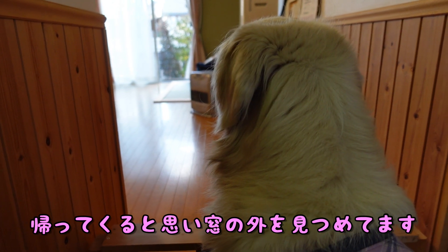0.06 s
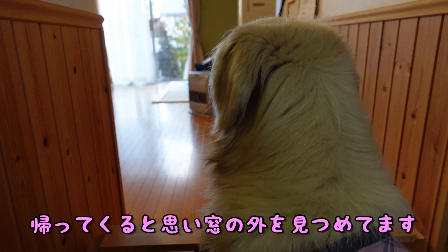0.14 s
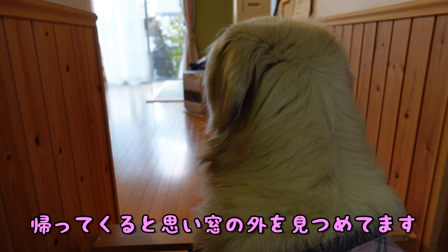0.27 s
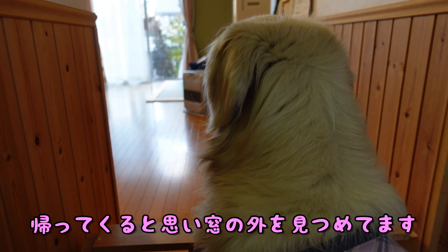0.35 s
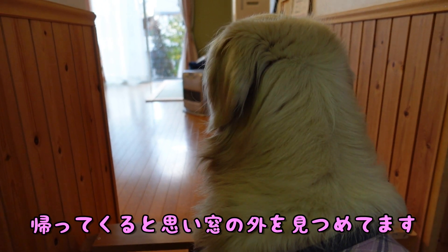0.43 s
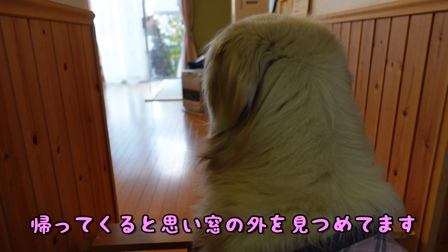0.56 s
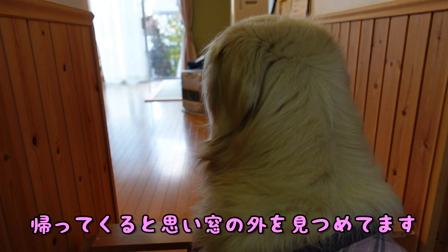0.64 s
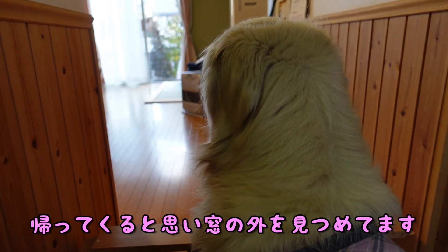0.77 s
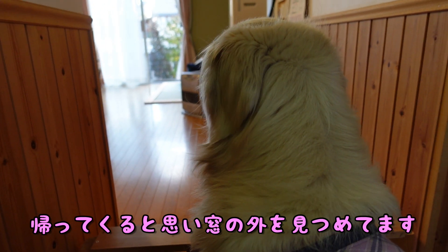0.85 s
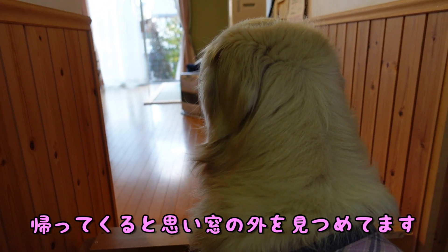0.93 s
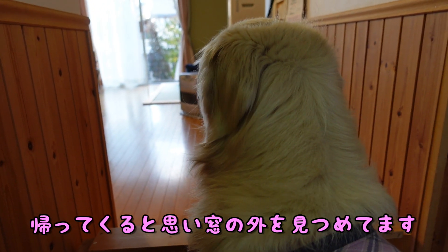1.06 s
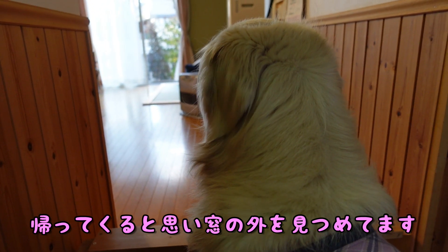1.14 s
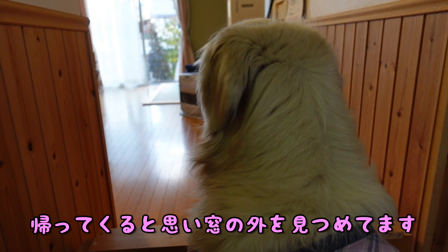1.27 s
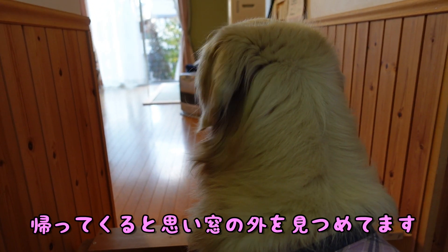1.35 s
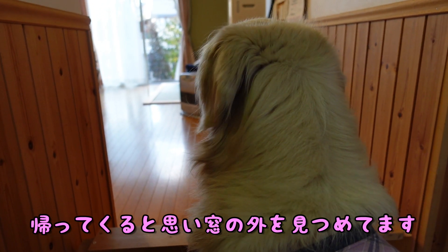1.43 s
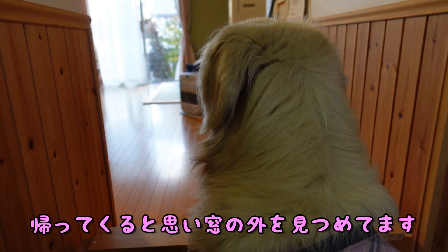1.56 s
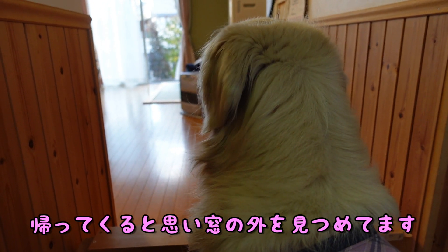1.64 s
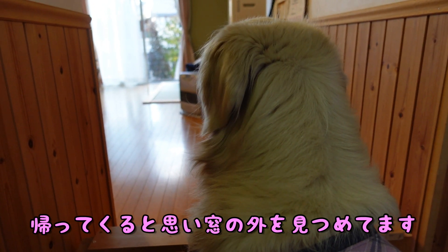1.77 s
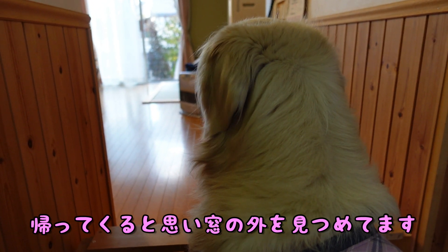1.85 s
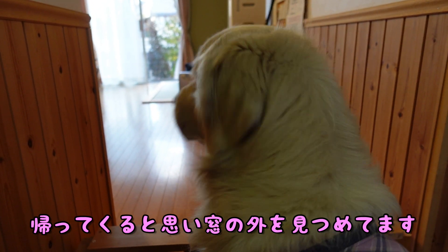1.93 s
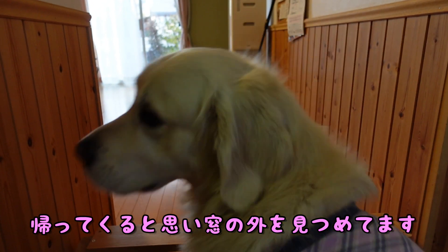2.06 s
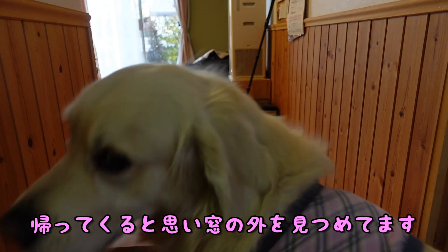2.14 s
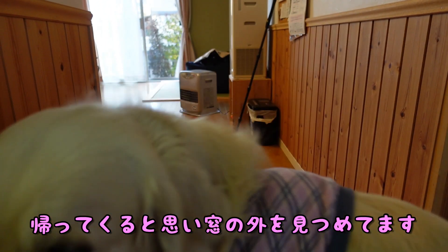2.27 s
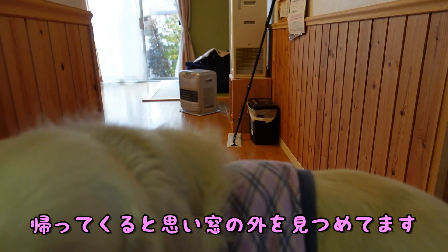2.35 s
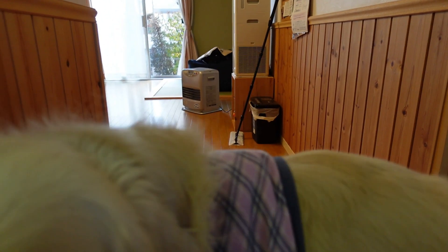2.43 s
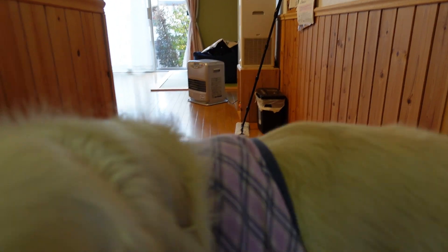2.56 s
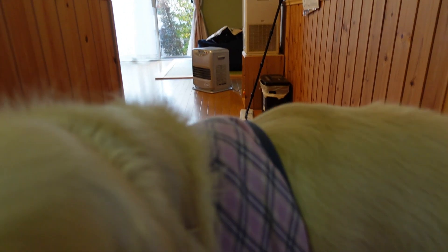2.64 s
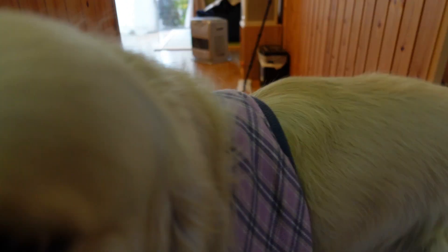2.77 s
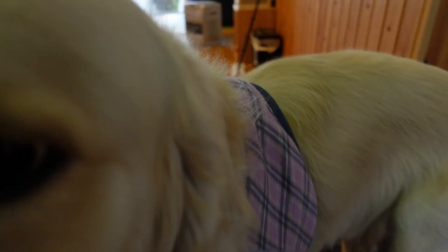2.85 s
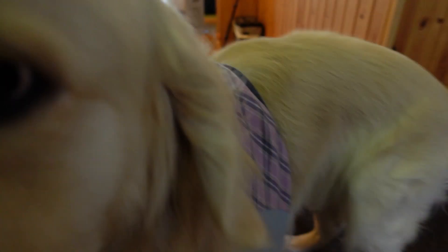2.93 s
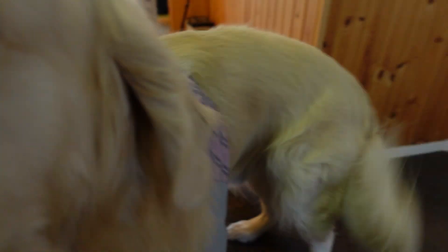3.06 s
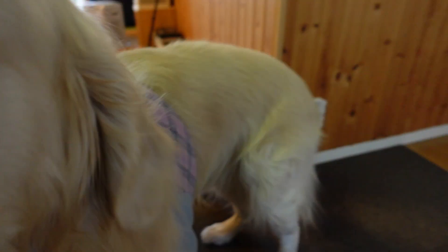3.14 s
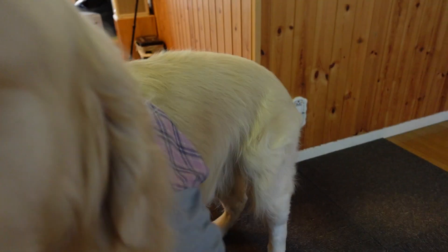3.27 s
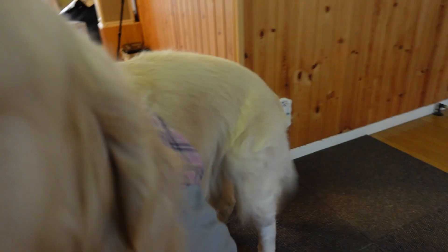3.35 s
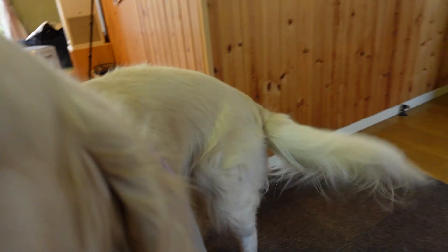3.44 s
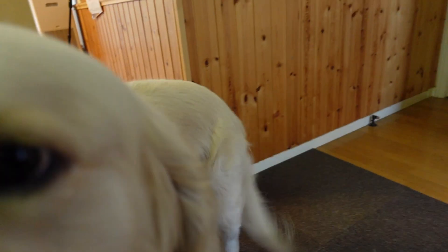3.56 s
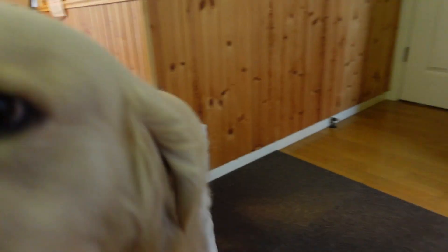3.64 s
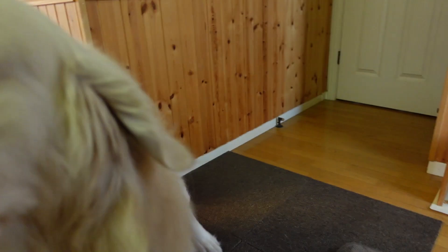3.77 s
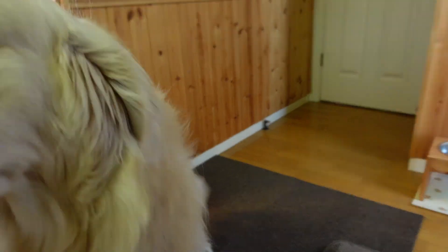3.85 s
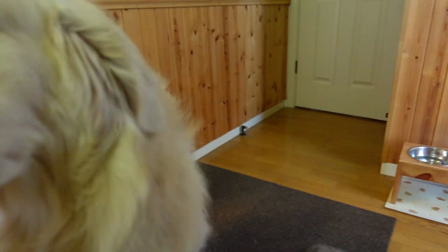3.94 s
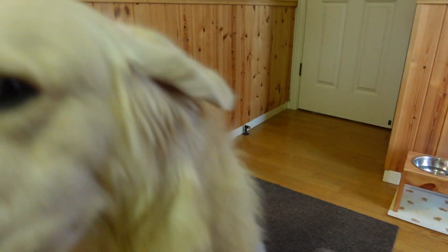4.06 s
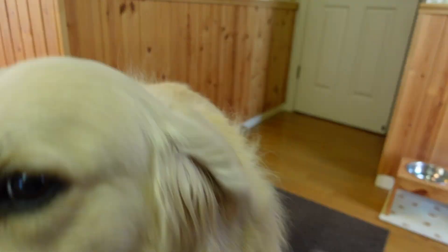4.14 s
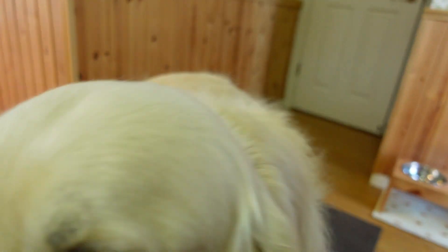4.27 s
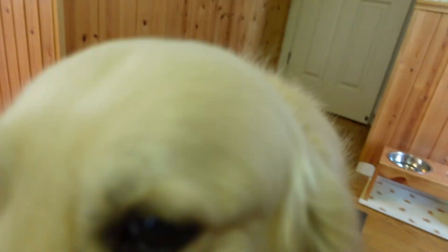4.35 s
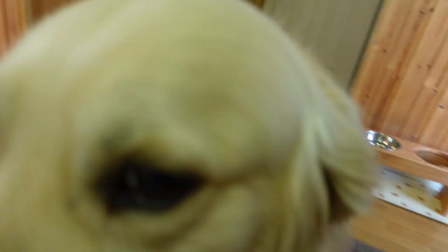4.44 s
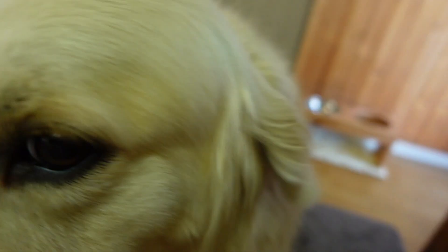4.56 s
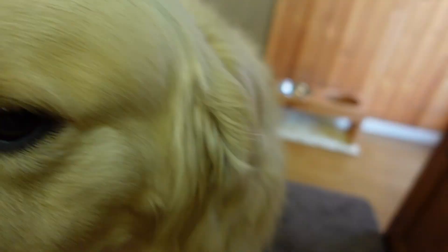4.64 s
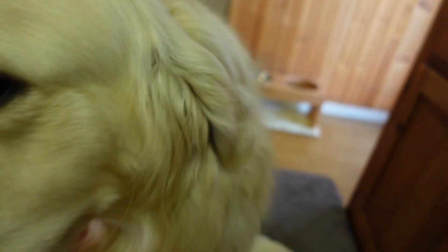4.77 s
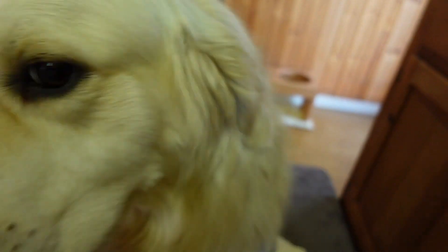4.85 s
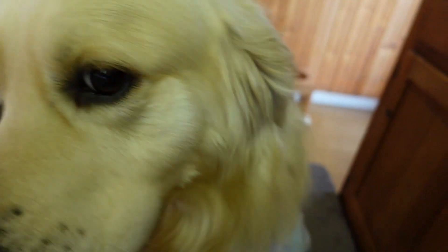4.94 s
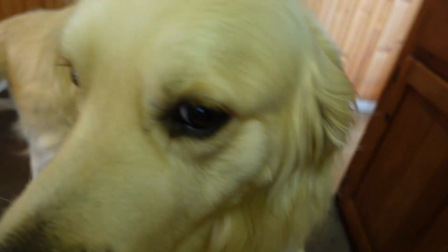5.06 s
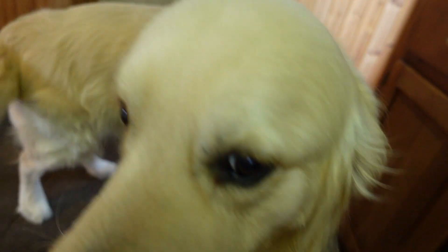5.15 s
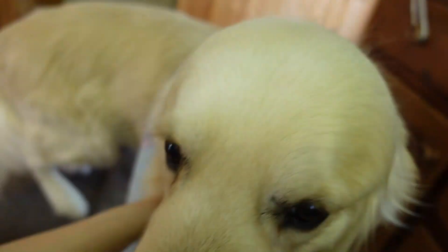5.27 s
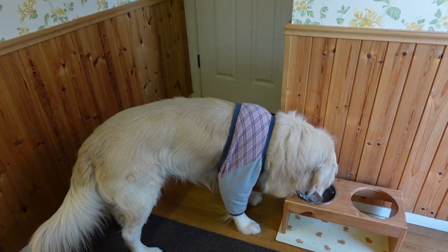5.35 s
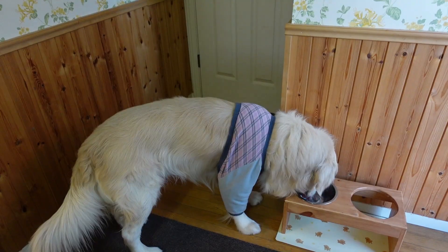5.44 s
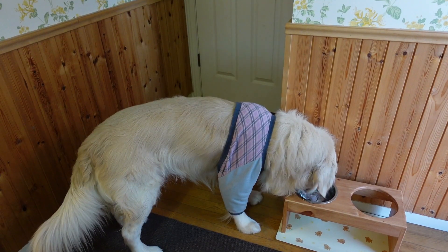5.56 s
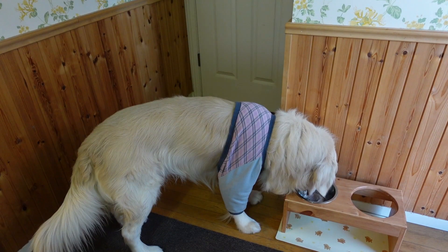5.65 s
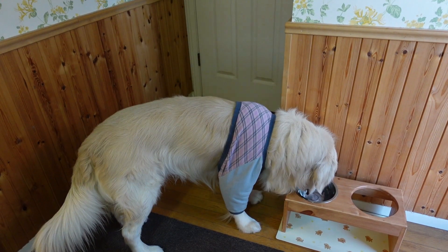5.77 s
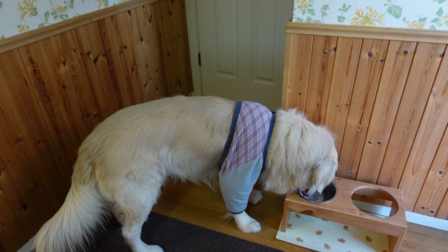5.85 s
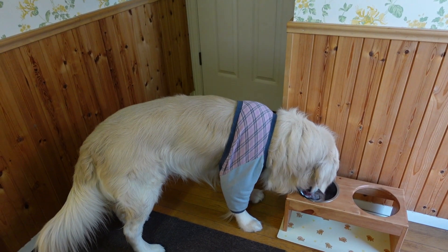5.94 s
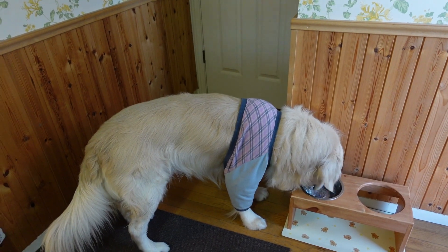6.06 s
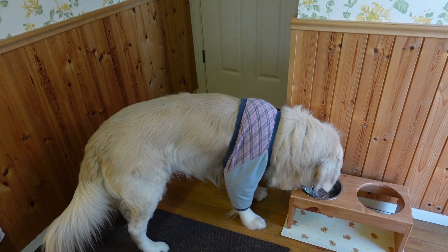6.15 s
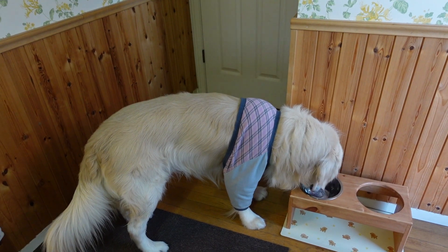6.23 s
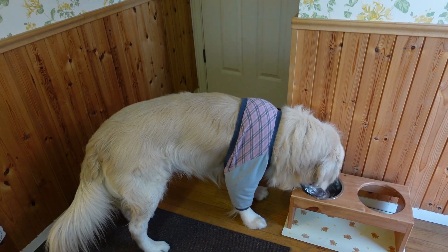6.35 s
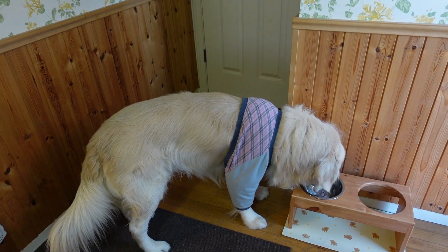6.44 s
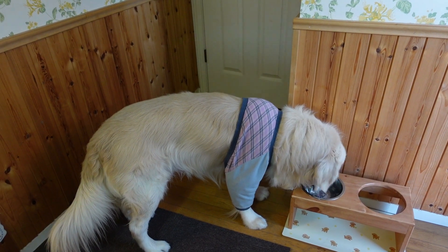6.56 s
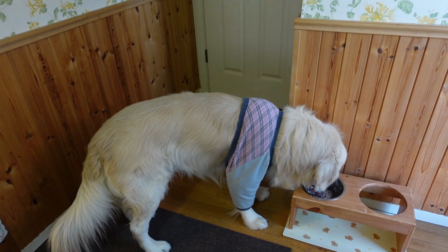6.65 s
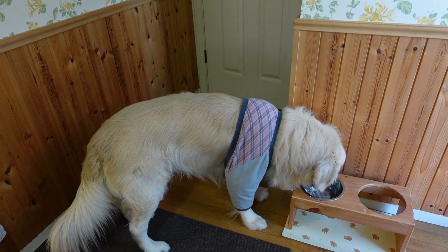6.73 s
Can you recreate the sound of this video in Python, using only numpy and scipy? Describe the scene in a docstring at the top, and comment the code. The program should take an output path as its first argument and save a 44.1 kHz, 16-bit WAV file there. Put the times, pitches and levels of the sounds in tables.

```python
"""In a wood-panelled room a big dog whines thinly and pads across the floor, sniffing and smacking its lips
at the microphone, and snorts once right into it. After a brief silence it laps water from a steel bowl a
little way off. An appliance hums before and after the silence. Air sounds are shaped noise; paws, water
and steel are decaying resonances; the whine is a wavering sine with overtones."""
import sys
import numpy as np
from scipy import signal
from scipy.fft import rfft, irfft
from scipy.io import wavfile
from scipy.ndimage import uniform_filter1d

SR = 44100
rng = np.random.default_rng(int(sys.argv[2]) if len(sys.argv) > 2 else 0)


def output_pcm(signal):
    """Save a mono or channel-first signal as 16-bit PCM at the path in sys.argv[1].

    Samples are clipped to [-1, 1] before scaling.
    """
    pcm = np.clip(np.atleast_2d(signal).T, -1, 1) * 32767
    wavfile.write(sys.argv[1], SR, np.round(pcm).astype(np.int16))


N = 299880

# the scene's clock, and the time since a blow (s)
TIME = np.arange(N) / SR
AGE = np.arange(2 ** 12 * 3) / SR
# the brief silence before the lapping: from_s, until_s
CUT = (5.352, 5.39)
# likeness of the two channels for sound from close by: hz, likeness (0-1)
CLOSE = [(100, .9995), (400, 0.99), (1000, 0.87), (2300, 0.77), (4500, 0.58), (12000, 0.54)]
# hiss of air at the nostrils: hz, level_db_per_hz
HISS = [(4000, -19), (7000, -5.5), (10000, -11), (13000, -17.5), (16000, -27)]
# water rocking in the bowl: time_s, level_db
SLOSH = [(5.391, -37), (5.44, -41.5), (5.578, -36.5), (5.81, -46), (5.97, -44), (6.136, -36),
         (6.594, -44.5), (6.8, -40.5)]


def amp(db):
    """Turns decibels into a gain."""
    return 10 ** (np.asarray(db) / 20)


def unit(x):
    """Scales to rms 1."""
    return x / np.sqrt(np.mean(x ** 2) + 1e-20)


def peaked(x):
    """Scales the loudest 4 ms to rms 0.5, for a crest near 1."""
    power = np.mean(np.atleast_2d(x) ** 2, 0)
    return x / np.sqrt(4 * uniform_filter1d(power, size=176).max())


def read(points, hz):
    """Reads a spectrum on a log-frequency axis."""
    f, value = np.transpose(points)
    return np.interp(np.log(hz + 1), np.log(f), value)


def level(s, db, fade=.01):
    """A gain curve that fades to -120 dB outside its span, over fade seconds."""
    times = np.r_[s[0] - abs(fade), s, s[-1] + abs(fade)]
    return amp(np.interp(TIME, times, np.r_[-120, db, -120]))


def add(mix, s, sound):
    """Lays a sound into the mix from s seconds on."""
    part = mix[:, round(s * SR):][:, :sound.shape[-1]]
    part += sound[..., :part.shape[1]]


def pan(db):
    """Gains of left against right."""
    return amp([[db / 2], [-db / 2]])


def drift(rate):
    """Random wander of rms 1 through rate knots per second."""
    knots = rng.standard_normal(int(N / SR * rate) + 2)
    return unit(np.interp(TIME * rate, np.arange(len(knots)), knots))


def noise(likeness, colour=None, size=N):
    """Two channels of noise, rms 1, with a given likeness and spectrum."""
    hz = np.fft.rfftfreq(size, 1 / SR)
    a, b = rfft(rng.standard_normal((2, size)))
    same = np.clip(read(likeness, hz), 0, 1)
    z = np.array([a, same * a + np.sqrt(1 - same ** 2) * b])
    gain = amp(read(colour, hz)) if colour else 1
    return unit(irfft(z * gain, size))


def resonate(x, hz, width_hz):
    """A resonance of gain 1 whose pitch may follow a curve."""
    turn = np.exp(2j * np.pi * np.cumsum(hz * np.ones(x.shape[-1])) / SR)
    r = np.exp(-np.pi * width_hz / SR)
    # turn the pitch down to zero, smooth, and turn it back up
    smooth = signal.lfilter([1 - r], [1, -r], x / turn + 1e-18)
    return 2 * (turn * smooth).real


def breathy(hz, width_hz):
    """Air through a cavity, fixed or moving: a fuzzy whistle of rms 1."""
    hz = np.clip(hz, 500, 8000)
    narrow = resonate(noise(CLOSE), hz, width_hz)
    return unit(resonate(narrow, hz, 2 * width_hz))


def swell(top_s, rise_s, hold_s, fall_db_per_s):
    """The gain of one push of air: climbs 20 dB during its rise, holds, then dies away."""
    early = np.maximum(top_s - TIME, 0) / max(rise_s, .002)
    late = np.maximum(TIME - top_s - abs(hold_s), 0)
    return amp(np.maximum(-20 * early - abs(fall_db_per_s) * late, -160))


def arch(top_s, width_s):
    """A smooth hump of height 1, down 9 dB at width_s on either side."""
    return np.exp(-np.square((TIME - top_s) / width_s))


def ring(hz, t60, rise=0., size=len(AGE)):
    """A sine that swells within one cycle and dies away; its pitch may climb by the fraction rise."""
    t = AGE[:size]
    life = t / max(t60, .001)
    onset = 1 - np.exp(-(2 * hz * t) ** 2)
    pitch_hz = hz * (1 + rise * np.minimum(life, 1))
    return onset * amp(-60 * life) * np.sin(2 * np.pi * np.cumsum(pitch_hz) / SR)


def room(x, early_db, tail_db, early_t60=0.045):
    """Direct sound, sparse echoes off near panels, and a diffuse tail that dies band by band."""
    # the room's decay: hz, t60_s
    decay = [(150, 0.53), (600, 0.21), (2500, 0.26), (6000, 0.34), (14000, 0.047)]
    size = len(AGE)
    sparse = rng.random(size) < 1500 / SR
    early = noise(CLOSE, size=size) * sparse * amp(-60 * AGE / early_t60) * (AGE > .002)
    hz, t, z = signal.stft(noise(CLOSE, size=size), SR, nperseg=256)
    dying = z * amp(-60 * t / read(decay, hz)[:, None])
    tail = signal.istft(dying, SR, nperseg=256)[1][:, :size]
    tail *= np.minimum(AGE / 0.012, 1)
    response = (amp(early_db) * unit(early) + amp(tail_db) * unit(tail)) / np.sqrt(size)
    response[:, 0] += 1  # the direct sound
    return signal.fftconvolve(np.atleast_2d(x), response, axes=1)[:, :x.shape[-1]]


def droplets(hz, length, octaves, count=30, damping=1):
    """A clump of tiny bubbles and drops, spread in pitch, thinning out and fading 8 dB per length."""
    out = np.zeros((1, len(AGE)))
    delays = np.linspace(0, 1, count) ** 1.7 * 2 * abs(length) * rng.uniform(.75, 1.25, count)
    pitches = rng.permutation(np.linspace(-1, 1, count))
    sizes_db = rng.permutation(np.linspace(-6, 6, count))
    cycles = 9 + 3 / max(abs(octaves), .06)  # bubbles of one size ring longer than a mixed splash
    for delay, pitch, size_db in zip(delays, pitches, sizes_db):
        drop_hz = np.clip(hz * 2 ** (octaves * pitch), 400, 15000)
        drop = ring(drop_hz, cycles / damping / drop_hz, rise=.07, size=1024)
        add(out, delay, amp(size_db - 8 * delay / abs(length)) * drop)
    return out


def appliance():
    """Wavering tones in a steady rush; after the silence the room booms a little more and rumbles less."""
    # steady rush of the room: hz, level_db_per_hz
    hush_colour = [(15, -75), (25, -72), (59, -14), (174, -12.5), (205, -8.5), (248, -6), (284, 0),
                   (342, -9.5), (414, -8), (449, -14), (604, -18), (654, -16.5), (1870, -23), (6660, -43),
                   (15800, -50)]
    hush_db = -39
    # the appliance's tones: pitch_hz, level_db
    hum_tones = [(75.4, -55), (279.9, -45.5), (301.5, -67), (425.3, -66), (613.7, -56.5), (1583, -71),
                 (4517, -73.5), (10094, -81.5)]
    # likeness of the two channels for sound from all round: hz, likeness (0-1)
    diffuse = [(100, 1), (350, 0.99), (1000, 0.44), (2300, 0.32), (4500, 0.24), (12000, 0.16)]
    by_bowl = TIME > CUT[1]
    tones = sum(amp(db) * unit(resonate(rng.standard_normal(N), hz, width_hz=3.8)) for hz, db in hum_tones)
    boom_colour = [(170, -26), (235, 3.5), (290, 7.0), (330, -9), (430, -43)]
    boom = noise(diffuse, boom_colour) * amp(-40.5)
    hum = amp(hush_db) * noise(diffuse, hush_colour) * pan(db=1) + tones
    rumble = signal.sosfiltfilt(signal.butter(2, 110, fs=SR, output="sos"), hum)
    return hum + by_bowl * (boom - amp(-7.5) * rumble)


def sniffs():
    """Turbulent air in the nose, with hiss at the nostrils and a hollow note from the throat."""
    # sniffs: full_flow_s, rise_s, hold_s, flow_db, then nostril hiss_db and throat_db against the flow
    pushes = [(2.509, 0.022, .014, -34.5, -12, -5), (2.59, .09, 0.095, -33, -13, -26),
              (2.797, .025, 0.011, -31, -12, 2.5), (2.903, 0.065, 0.0079, -32.5, -14, -5.5),
              (3.085, 0.041, .03, -42.5, -16, -2), (3.255, 0.089, .03, -37, -16, -0.5),
              (3.305, .08, 0.006, -44, -4, -9), (3.565, .02, 0.018, -47, -11, -9),
              (3.668, 0.042, 0.094, -26, -9.5, -7.5), (4.03, 0.13, 0.026, -35.5, -19, 1),
              (4.099, 0.029, 0.0055, -29, -10, -3), (4.17, 0.041, 0.037, -37.5, -11.5, -13),
              (4.315, 0.04, 0.015, -37, -14.5, 0.5), (4.473, .035, 0.016, -38.5, -9.5, -5),
              (4.62, 0.12, 0.022, -43, -10, 3), (4.7, .05, .04, -59, 6, -4)]
    # air in the nose: hz, level_db_per_hz
    nose_colour = [(530, -14), (900, -8), (1180, -5), (1430, -7.5), (2340, -5.5), (2670, -7), (3340, -9),
                   (4120, -9.5), (6060, -13.5), (7490, -25), (9000, -33), (11700, -52), (19800, -120)]
    # air in the throat: hz, level_db_per_hz
    throat_colour = [(200, -7), (450, 13), (800, 8), (1150, -4.5), (1500, -27), (3000, -34)]
    # faint flow between sniffs while the muzzle is near: from_s, until_s
    near = (2, 5.33)
    near_db, near_hiss_db, near_throat_db = -47, -14, 2  # hiss and throat against the flow
    parts = amp([[0], [near_hiss_db], [near_throat_db]])
    power = parts ** 2 * level(near, [near_db, near_db], fade=.35) ** 2
    for s, rise, hold, db, hiss_db, throat_db in pushes:
        parts = amp([[db], [db + hiss_db], [db + throat_db]])
        power += (parts * swell(s, rise, hold, fall_db_per_s=128)) ** 2
    flow, hiss, throat = np.sqrt(power)
    air = flow * noise(CLOSE, nose_colour) * pan(db=-0.5)
    air += hiss * noise(CLOSE, HISS) * pan(db=-2.0)
    air += throat * noise(CLOSE, throat_colour) * pan(db=1.5)
    # a hollow note sinks through one long sniff
    gust_s, gust_hz, gust_sag_hz_per_s, gust_db = 3.79, 1114, 1800, -31
    note = breathy(gust_hz - gust_sag_hz_per_s * (TIME - gust_s), width_hz=200)
    air += amp(gust_db) * note * swell(gust_s, rise_s=0.12, hold_s=0.021, fall_db_per_s=193)
    return air * amp(0.89 * drift(rate=140))


def whine():
    """A near-pure nasal whistle with two unsteady overtones and a breathy edge."""
    # the whistle: time_s, pitch_hz, level_db
    glide_points = [(2.05, 3960, -50), (2.066, 3980, -32.5), (2.082, 3993, -26.5), (2.268, 4050, -38),
                    (2.284, 4084, -23), (2.304, 4170, -34), (2.32, 4010, -35), (2.348, 4030, -55),
                    (2.45, 4100, -47)]
    # overtones: multiple, level_db, strongest_s, fall_s (9 dB down on either side)
    overtones = [(2, -47, 2.2, .09), (3, -56, 2.27, .15)]
    # air through gliding cavities: full_flow_s, fall_s (9 dB down on either side), cavity_hz,
    # glide_hz_per_s, width_hz, level_db
    leaks = [(2.25, .115, 4800, 2000, 300, -36), (2.32, .1, 3060, -300, 240, -42),
             (2.1, .07, 3380, -900, 300, -46), (2.31, .15, 4200, 0, 2000, -45)]
    s, hz, db = np.transpose(glide_points)
    pitch_hz = np.interp(TIME, s, hz) * (1 + .004 * drift(rate=150))
    phase = 2 * np.pi * np.cumsum(pitch_hz) / SR
    tone = np.sqrt(2) * np.sin(phase) * level(s, db) * amp(0.92 * drift(rate=70))
    sounding = (TIME > s[0]) * (TIME < s[-1])
    for k, partial_db, top_s, width_s in overtones:
        flutter = amp(partial_db + 3.5 * drift(rate=60)) * arch(top_s, width_s)
        tone += flutter * np.sin(k * phase + 0.64 * drift(rate=200)) * sounding
    air = 0
    for top_s, width_s, cavity_hz, glide, width_hz, leak_db in leaks:
        whistle = breathy(cavity_hz + glide * (TIME - top_s), width_hz)
        air = air + amp(leak_db) * whistle * arch(top_s, width_s)
    return room(tone + air, early_db=-17, tail_db=-12)


def paws():
    """Each footfall booms the floorboards, scuffs and settles; knocks of paws and body are short and mostly
    higher."""
    # paws on the floor: start_s, level_db, boom_hz, t60_s, scuff_db against the boom
    steps = [(2.046, -21.5, 200, 0.19, -5), (2.082, -21, 196.5, .6, -6), (2.202, -16, 165.7, 0.38, -4),
             (2.509, -10, 204.7, 0.23, -5), (2.756, -15.5, 156, 0.21, -13.5), (2.794, -15, 204, 0.11, 5),
             (2.895, -16.5, 242, 0.19, -8.5), (3.081, -13, 111, 0.24, 6), (3.223, -14.5, 204, .11, -29),
             (3.524, -21.5, 110, 0.3, -3.5), (3.636, -11, 160, 0.21, -13), (3.789, -21, 123, .34, -0.5),
             (4.117, -9, 111.6, .17, -3.5), (4.136, -9, 191, 0.1, -10.5), (4.457, -20, 152, 0.18, -9)]
    # knocks of paws and body: start_s, level_db, pitch_hz
    knocks = [(2.202, -19.5, 494), (2.506, -21, 575), (3.094, -16.5, 397), (3.634, -17, 440),
              (3.663, -11, 526), (3.739, -11.5, 470), (3.857, -14.5, 472), (3.886, -19, 600),
              (4.196, -9.5, 590), (4.873, -6, 590), (4.937, -7, 620), (4.994, -3.5, 470), (5.313, -28, 610)]
    # the boards rebound as the weight settles on the paw
    settle_s, settle_db, settle_hz, settle_t60 = .045, -16.5, 210.7, 0.22
    # the joists give a deep note, growing as the square of the blow
    joist_hz, joist_t60, joist_db = 105, .16, -4
    boards_colour = [(45, -49), (95, -3.5), (190, 3.5), (330, -1.0), (600, -19.5), (1500, -26.5), (4000, -60)]
    out = np.zeros((2, N))
    for s, db, hz, t60, scuff_db in steps:
        scuff = noise(CLOSE, boards_colour, size=len(AGE)) * amp(-60 * AGE / 0.38)
        boom = ring(hz, t60) + amp(scuff_db) * scuff
        soft_onset = 1 - np.exp(-AGE / 0.0025)
        add(out, s, amp(db) * peaked(boom * soft_onset))
        add(out, s + settle_s, amp(db + settle_db) * ring(settle_hz, settle_t60))
        add(out, s, amp(2 * db + joist_db) * ring(joist_hz, joist_t60))
    for s, db, hz in knocks:
        knock = room(ring(hz, t60=0.012), early_db=-12.0, tail_db=-7)
        add(out, s, amp(db) * peaked(knock))
    return out


def lips():
    """Wet lips part in a quick run of bursting films of saliva, close to the microphone."""
    # lip smacks: start_s, level_db, pitch_hz, length_s (8 dB fall), spread_octaves (either way)
    smacks = [(2.777, -23.5, 2440, 0.00195, .8), (2.792, -17, 2180, 0.031, 0.61),
              (3.214, -25.5, 2420, .027, 0.13), (3.395, -19, 1950, 0.0032, .35),
              (3.985, -30, 5870, 0.0029, 0.099), (4.023, -11, 3370, 0.0041, 0.52),
              (4.034, -13, 2570, 0.0029, 0.68), (4.097, -16.5, 4000, .004, 0.75),
              (4.669, -18.5, 1790, 0.0046, 0.13), (4.761, -16.5, 1580, .009, 1.26),
              (4.771, -20, 2900, 0.0071, 0.45)]
    out = np.zeros((2, N))
    for s, db, hz, length, octaves in smacks:
        films = droplets(hz, length, octaves, count=16, damping=2.5)
        wet = room(films, early_db=-13, tail_db=-12, early_t60=.05)
        add(out, s, amp(db) * peaked(wet))
    return out * pan(db=0.5)


def snort():
    """A hard blast through the nose in three pushes; the nostril's resonance arches up and falls back."""
    # pushes of the snort: full_flow_s, rise_s, hold_s, flow_db, hiss_db against the flow
    pushes = [(4.765, 0.013, 0.024, -33.5, -21), (4.898, 0.13, 0.029, -23.5, -12),
              (4.943, 0.036, 0.057, -13, -9.5)]
    # the blast: hz, level_db_per_hz
    blast_colour = [(88, -46), (150, -21), (250, -7), (282, -6), (368, -7), (408, -1.5), (1040, -3.5),
                    (2210, -1), (2770, -1), (3140, -1.5), (3800, -5), (6110, -3.5), (10000, -41),
                    (13000, -35), (22000, -120)]
    # likeness of the two channels for a nose right at the microphone: hz, likeness (0-1)
    touching = [(400, 1), (1000, 0.92), (2300, 0.74), (4500, 0.66), (12000, 0.75)]
    power = 0
    for s, rise, hold, db, hiss_db in pushes:
        power = power + (amp([[db], [db + hiss_db]]) * swell(s, rise, hold, fall_db_per_s=185)) ** 2
    flow, hiss = np.sqrt(power)
    # the nostril's resonance arches up from rest at the height of the blast
    rest_hz, arch_hz, arch_s, arch_width_s = 2120, 1130, 4.972, 0.024
    nostril = breathy(rest_hz + arch_hz * arch(arch_s, arch_width_s), width_hz=430).mean(0)
    nostril *= amp(-14) * swell(pushes[-1][0], rise_s=0.037, hold_s=0.071, fall_db_per_s=700)
    air = (flow * noise(touching, blast_colour) + nostril) * pan(db=0.5)
    air += hiss * noise(touching, HISS) * pan(db=-.5)
    return air * amp(1.1 * drift(rate=280))


def drips(count=70):
    """Stray drops fall back from the jowls, louder while the water rocks; faint ones are the most common."""
    out = np.zeros((1, N))
    s, db = np.transpose(SLOSH)
    for k, (when, pitch, size) in enumerate(rng.random((count, 3))):
        at = s[0] + (s[-1] - s[0]) * (k + when) / count
        hz = 1200 * 2 ** (2.4 * pitch)
        drop_db = np.interp(at, s, db) - 7 + 6.1 * size ** 2 - 5 * pitch
        add(out, at, amp(drop_db) * ring(hz, 22 / hz, rise=0.11, size=2048))
    return room(out, early_db=-4, tail_db=-5, early_t60=.06)


def lapping():
    """The tongue pulls air pockets that plop, and flings drops and mist; bowl and panelled corner answer."""
    # air pockets closing under the tongue: start_s, level_db, pitch_hz (midway in the climb)
    plops = [(5.392, -28, 2450), (5.451, -26.5, 2840), (5.51, -18, 2035), (5.521, -22.5, 1790),
             (5.569, -22, 2090), (5.656, -18.5, 2550), (5.668, -17, 2320), (5.711, -21.5, 2600),
             (5.995, -16, 1476), (5.999, -12, 1480), (6.011, -11, 1420), (6.02, -27, 1410),
             (6.075, -20.5, 2830), (6.116, -30, 1080), (6.163, -22.5, 2640), (6.169, -26, 1080),
             (6.402, -15.5, 2646), (6.419, -23, 830), (6.48, -17, 2506), (6.488, -13.5, 2540),
             (6.526, -23, 2440), (6.692, -32.5, 1240), (6.781, -27, 1900)]
    # splashes of the tongue: start_s, level_db, pitch_hz, spread_octaves (either way),
    # fine mist_db against the splash
    splashes = [(5.473, -31, 6540, 0.082, -29), (5.523, -26.5, 3660, 0.23, -16),
                (5.554, -21, 5170, .55, -7.5), (5.661, -25.5, 3840, .48, -22), (5.707, -28, 4500, 0.4, -20),
                (5.868, -32, 3650, 0.58, -32), (5.903, -33, 2980, 1.34, -18),
                (6.009, -22.5, 2930, 0.54, -12), (6.048, -25, 4800, 0.72, -15),
                (6.074, -27.5, 9400, 0.51, -10), (6.17, -17, 1840, 0.71, -18),
                (6.179, -22, 4630, 0.17, -25), (6.304, -38, 1880, 0.64, -24), (6.403, -25, 4930, 0.5, -12),
                (6.415, -21, 1160, .77, -17), (6.478, -23.5, 4540, 0.44, -9),
                (6.521, -23.5, 1020, 0.97, -10), (6.529, -20.5, 3520, 0.48, -25),
                (6.557, -21, 3640, 0.49, -20), (6.629, -27.5, 4480, 0.32, -11),
                (6.765, -29, 8700, 0.11, -22), (6.765, -24, 3640, 1.23, -22), (6.779, -24, 4560, 0.43, -20)]
    # water rocking in the bowl: hz, level_db_per_hz
    slosh_colour = [(240, -56), (400, -2.5), (690, -1.5), (756, -1), (1170, -5), (1390, -1), (1590, -2),
                    (2390, -7), (3100, -6.5), (12100, -28.5), (15000, -35)]
    # modes of the steel: pitch_hz, gain_db, t60_s
    bowl_modes = [(773, 8.5, 0.17), (1006, 8, 0.24), (1400, -1, 0.14), (1910, -2, 0.098), (2116, 1, 0.14),
                  (2850, 5.5, 0.24), (4230, -1, 0.18)]
    splash_s, mist_hz, mist_octaves = .029, 8750, .43
    out = drips()
    for s, db, hz in plops:
        # each pocket starts a little low and climbs, and sheds smaller bubbles of nearly its own pitch
        pocket = peaked(ring(hz * 0.96, t60=0.023, rise=.09))
        shed = peaked(droplets(hz, length=.012, octaves=0.22, count=6))
        plop = room(pocket + amp(-5) * shed, early_db=-1.0, tail_db=-4.5, early_t60=0.054)
        add(out, s, amp(db) * peaked(plop))
    for s, db, hz, octaves, mist_db in splashes:
        drops = peaked(droplets(hz, splash_s, octaves, count=18))
        mist = peaked(droplets(mist_hz, splash_s, mist_octaves, count=24))
        splash = room(drops + amp(mist_db) * mist, early_db=-2.0, tail_db=-2.5, early_t60=0.051)
        add(out, s, amp(db) * peaked(splash))
    out += level(*np.transpose(SLOSH)) * noise(CLOSE, slosh_colour) * amp(1.7 * drift(rate=220))
    steel = sum(amp(db) * resonate(out, hz, 1.8 / t60) for hz, db, t60 in bowl_modes)
    return (out + steel) * pan(db=-2.5)


def scene():
    """The dog, thinned in the deep bass by the microphone, over the hum of the room."""
    dog = sniffs() + whine() + paws() + lips() + snort() + lapping()
    thin = signal.butter(3, 75, "highpass", fs=SR, output="sos")
    return appliance() + signal.sosfilt(thin, dog)


def record(dry):
    """The sound drops out for a moment; full-scale clipping and a band limit follow."""
    kept = uniform_filter1d(1. * ((TIME < CUT[0]) | (TIME > CUT[1])), size=32)
    low_pass = signal.firwin(511, 15900, window=("kaiser", 9), fs=SR)  # cutoff in Hz
    return signal.oaconvolve(np.clip(dry * kept, -1, 1), low_pass[None], "same", axes=1)


dry = scene()
out = record(dry)
output_pcm(out)
```